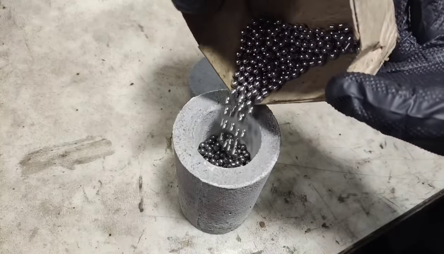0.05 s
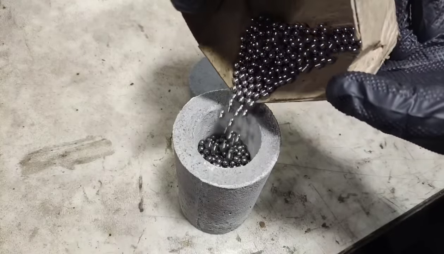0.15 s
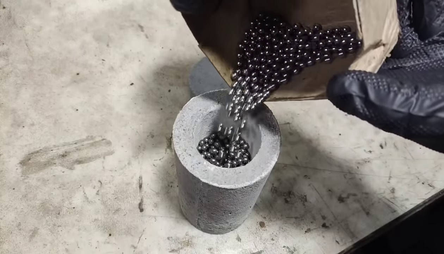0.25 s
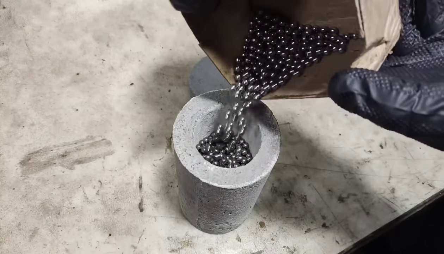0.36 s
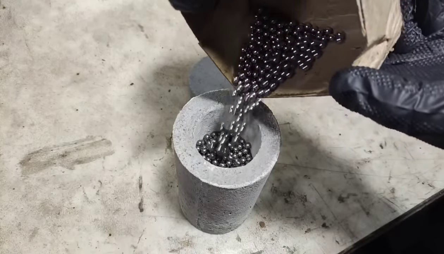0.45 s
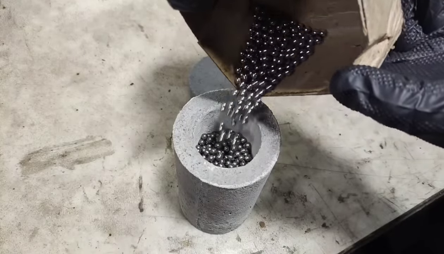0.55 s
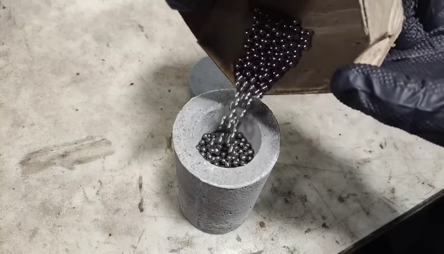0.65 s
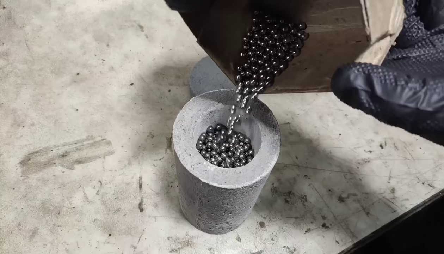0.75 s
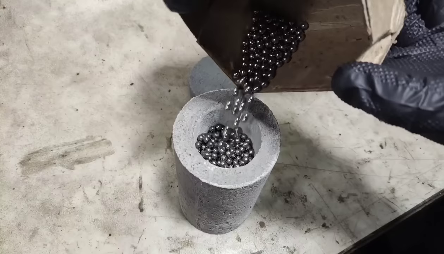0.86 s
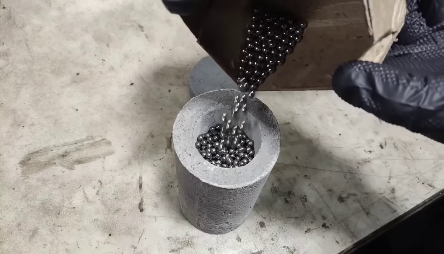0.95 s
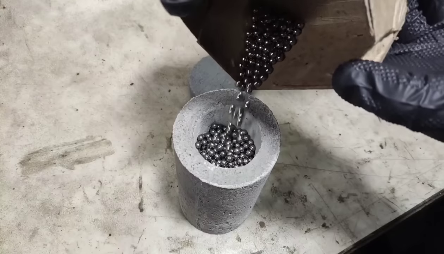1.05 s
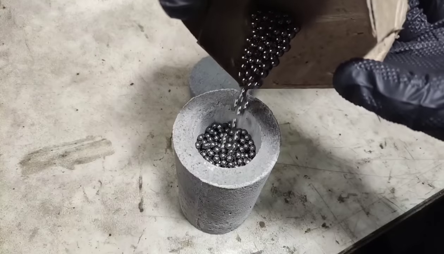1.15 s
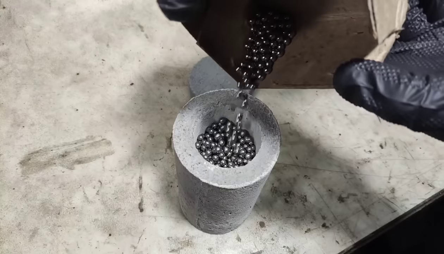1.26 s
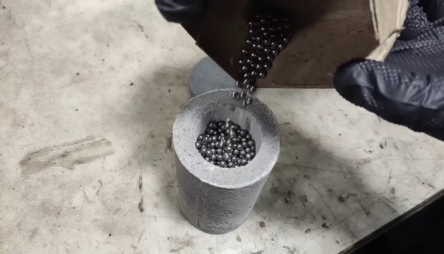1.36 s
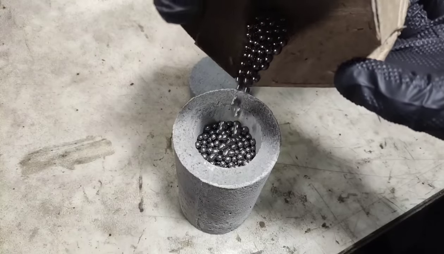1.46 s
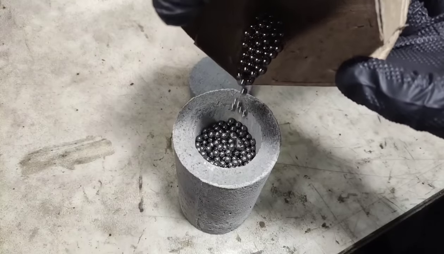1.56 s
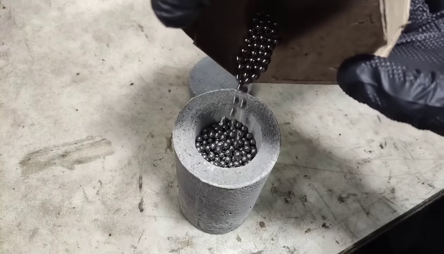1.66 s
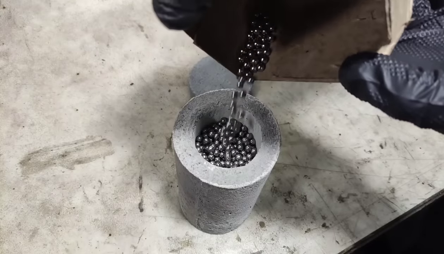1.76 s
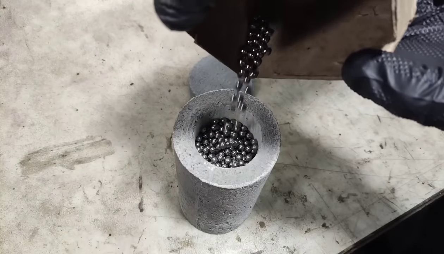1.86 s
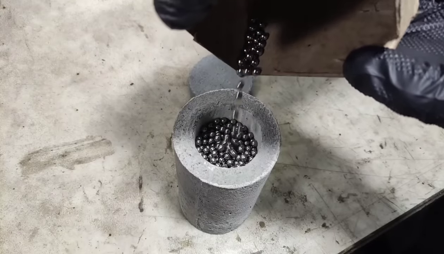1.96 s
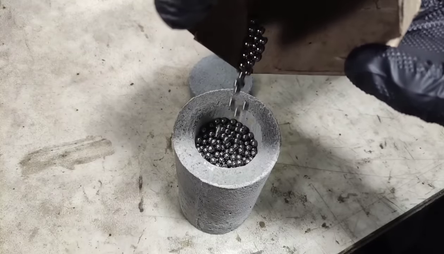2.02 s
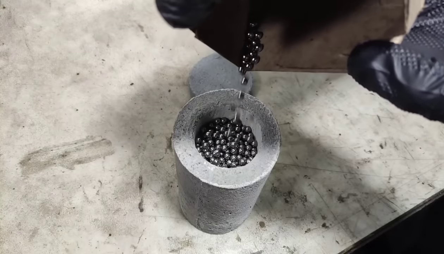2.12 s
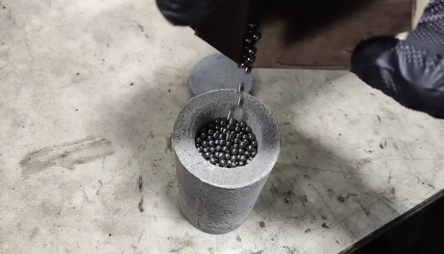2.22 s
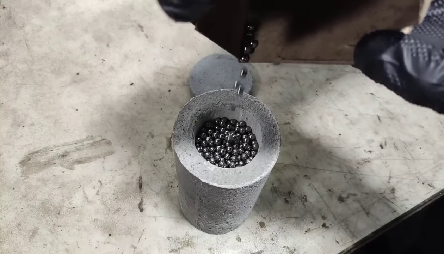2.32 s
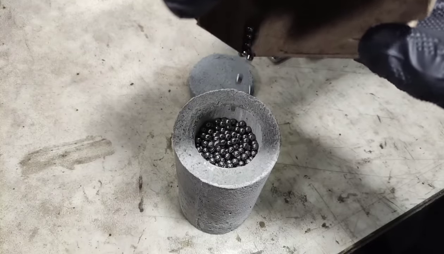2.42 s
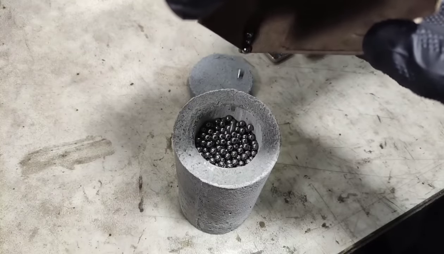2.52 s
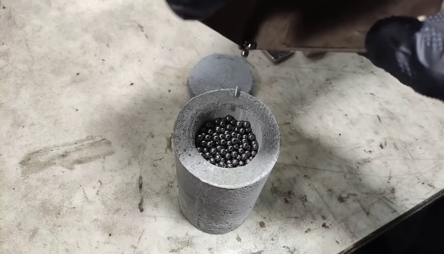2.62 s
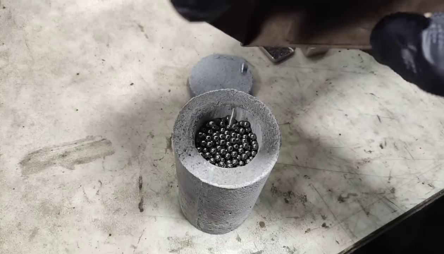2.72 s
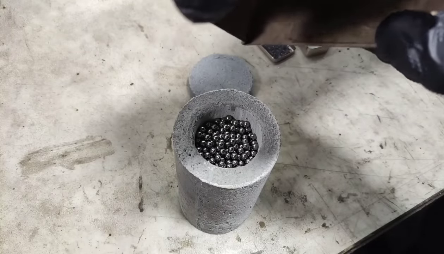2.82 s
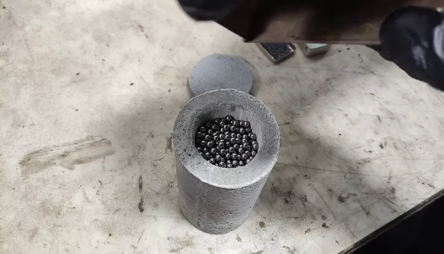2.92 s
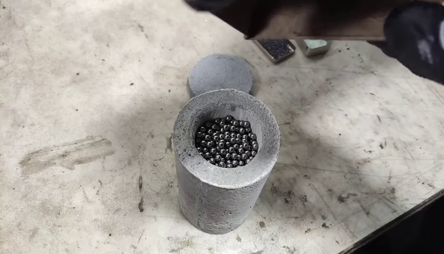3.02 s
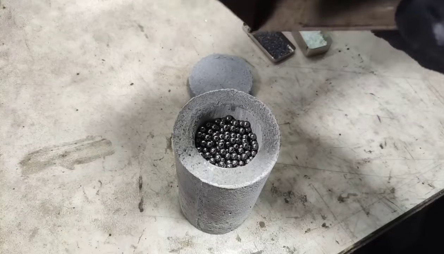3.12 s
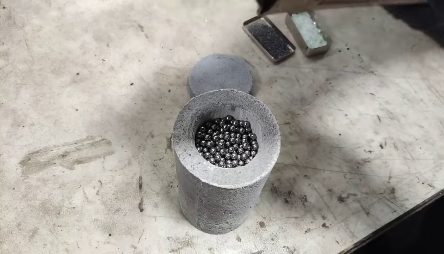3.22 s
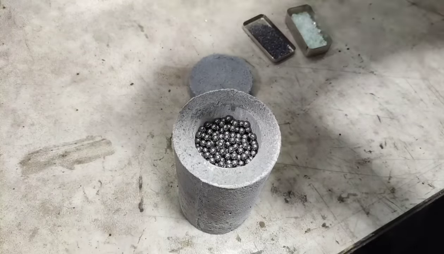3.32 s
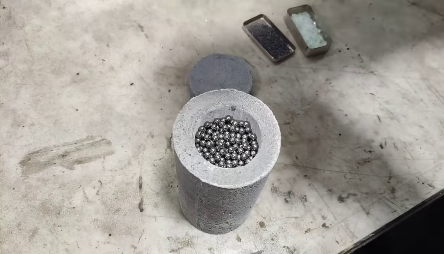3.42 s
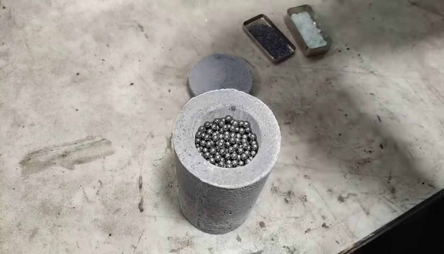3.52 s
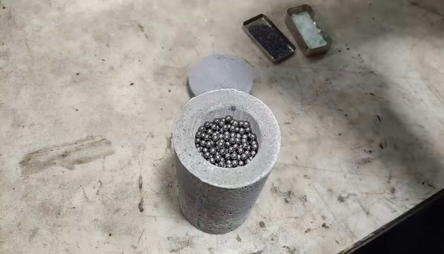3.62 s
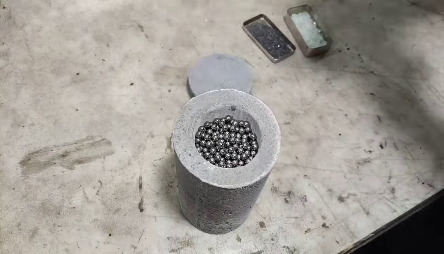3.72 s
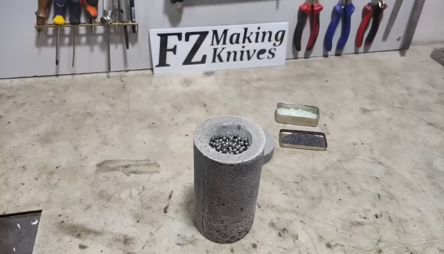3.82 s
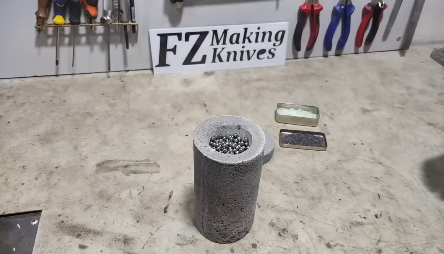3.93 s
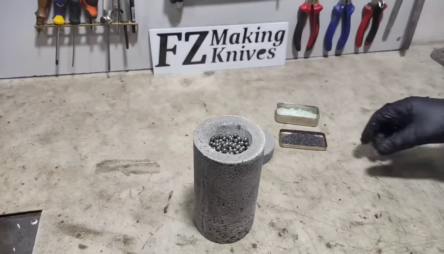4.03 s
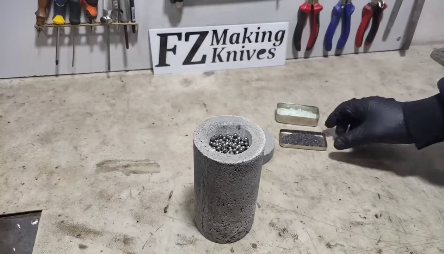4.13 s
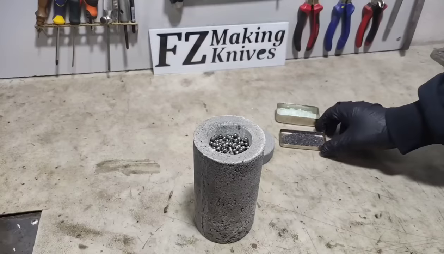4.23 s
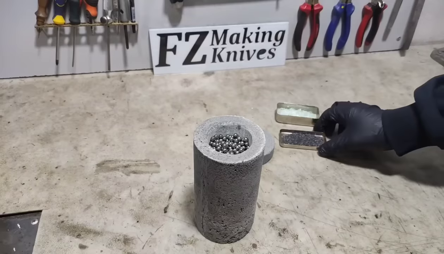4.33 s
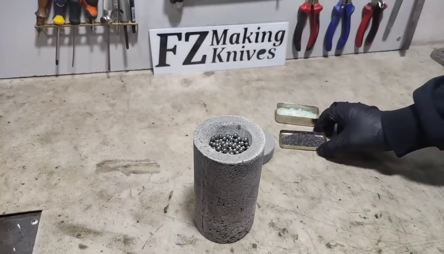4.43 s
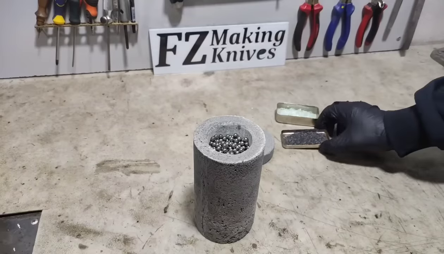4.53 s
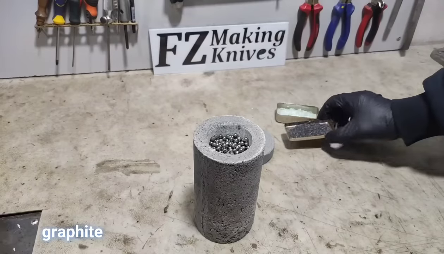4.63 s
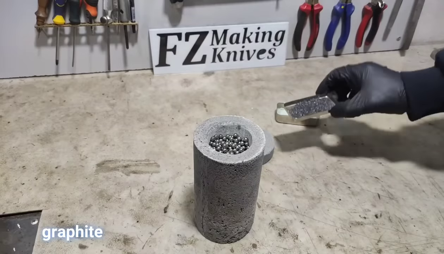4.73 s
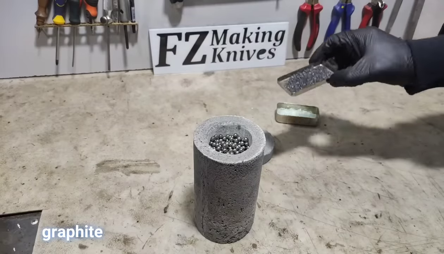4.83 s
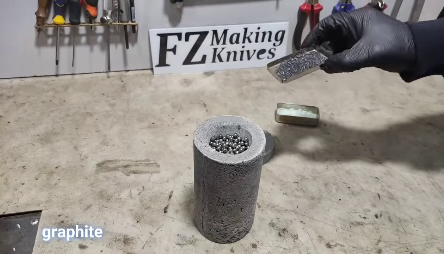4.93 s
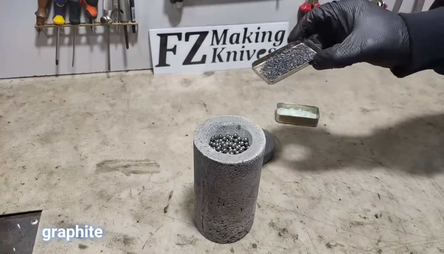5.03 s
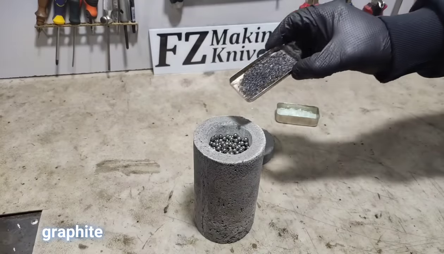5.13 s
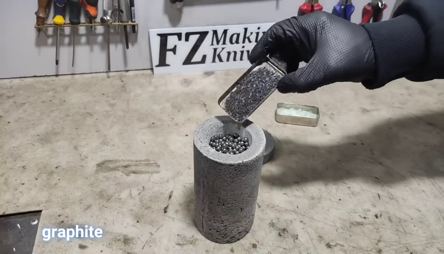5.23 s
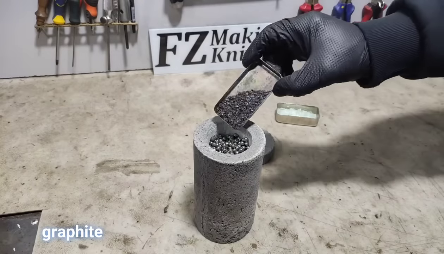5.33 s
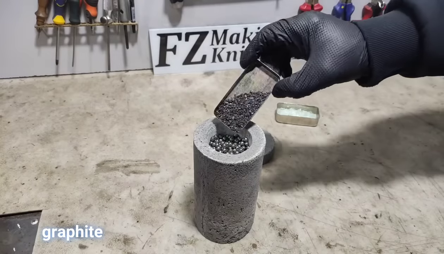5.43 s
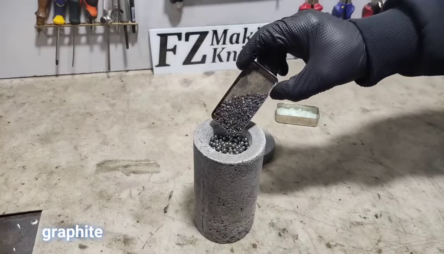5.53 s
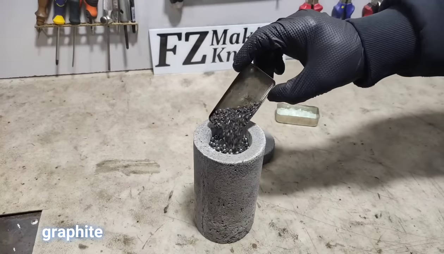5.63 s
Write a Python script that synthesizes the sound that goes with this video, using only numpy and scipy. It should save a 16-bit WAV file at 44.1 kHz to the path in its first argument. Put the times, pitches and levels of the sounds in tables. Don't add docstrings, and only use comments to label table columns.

```python
import sys
import numpy as np
from scipy import signal
from scipy.fft import rfft, irfft, next_fast_len
from scipy.io import wavfile
from scipy.ndimage import uniform_filter1d, map_coordinates

SR = 44100
rng = np.random.default_rng(int(sys.argv[2]) if len(sys.argv) > 2 else 0)


def volts_from_decibels(level):
    exponent = np.asarray(level, float) / 20
    return 10 ** exponent


def unload_wav(signal):
    wavfile.write(
        sys.argv[1],
        SR,
        np.round(np.clip(np.atleast_2d(signal).T, -1, 1) * 32767).astype(np.int16),
    )


N = 250047
SECONDS = np.arange(N) / SR

FULL_DB = -38
EMPTY_S, EMPTY_DB_PER_S = 3.01, 250
# start in seconds, peak in dB, left-right in dB, treble in dB.
LAST_BALLS = [(2.112, -23.5, 7, -14), (2.2783, -24.5, 10, -19), (2.3011, -23.5, 2, -17),
              (2.3334, -26.5, 5, -11), (2.354, -25, 0, -14.5), (2.382, -29.5, 0, -10), (2.414, -30, 1, -8),
              (2.434, -24, 8, -16), (2.454, -26.5, -2, -12), (2.482, -28, 0, -11.5),
              (2.493, -27.5, -1, -12), (2.533, -29, -1, -10), (2.586, -22.5, 9, -16),
              (2.611, -28.5, 4, -7.5), (2.6478, -41, 3, -12), (2.6843, -21, 0, -25),
              (2.7382, -26.5, 3, -12.5), (2.794, -29.5, -3, -21), (2.8728, -27, -2, -18),
              (2.9375, -25.5, -4, -13), (2.956, -28, 6, -4), (3.0029, -28, 3, -13)]


def unit(x):
    return x / np.sqrt(np.mean(x ** 2) + 1e-20)


def along(points, hz):
    f, v = np.transpose(points)
    return np.interp(np.log(hz + 1), np.log(f + 1), v)


def curve(rows):
    s, db = np.transpose(rows)
    return np.interp(SECONDS, s, db, left=-150, right=-150)


def wobble(rate):
    knots = rng.standard_normal(int(N * rate / SR) + 4)
    return map_coordinates(knots, [SECONDS * rate])


def fade(start_s, db_per_s):
    return -db_per_s * np.maximum(SECONDS - start_s, 0)


def filtered(x, response):
    m = next_fast_len(N + SR // 4)
    return irfft(rfft(x, m) * response(np.fft.rfftfreq(m, 1 / SR)), m)[..., :N]


def mode(f, hz, width_hz):
    return 1j * f * width_hz / (hz * hz - f * f + 1j * f * width_hz)


def noise(spectrum, alike):
    def response(hz):
        turn = np.arccos(np.clip(along(alike, hz), -1, 1)) / 2
        return volts_from_decibels(along(spectrum, hz)) * [np.cos(turn), np.sin(turn)]

    mid, side = filtered(rng.standard_normal((2, N)), response)
    return unit(np.array([mid + side, mid - side]))


def impulses(times, gains):
    at = np.clip(np.rint(times * SR).astype(int), 0, N)
    return np.bincount(at.ravel(), gains.ravel(), N + 1)[:N]


def stream(share):
    # time in seconds, rate in balls per second.
    ball_rate = [(0, 1100), (1, 900), (1.6, 650), (2.2, 400), (3.1, 150)]
    s, rate = np.transpose(ball_rate)
    t = np.arange(round(s[-1] * SR)) / SR
    passed = np.cumsum(share * np.interp(t, s, rate)) / SR
    times = np.interp(np.cumsum(rng.exponential(size=4000)), passed, t, right=N)
    return times[times < N]


def swing():
    # time in seconds, strength in dB.
    flow = [(0, -39), (.3, -38.5), (.45, -38.5), (.61, -38.5), (.65, -39), (.67, -37.5), (.9, -39.5),
            (1.0, -41), (1.08, -46.5), (1.13, -42.5), (1.4, -43.5), (1.6, -48.5), (1.85, -51.5),
            (2.03, -44.5), (2.2, -52.5), (2.27, -57), (2.6, -66), (3.08, -89)]
    return curve(flow) - FULL_DB


def lulls():
    # middle in seconds, depth in dB, half length in seconds.
    dips = [(0.274, 6, 0.0072), (0.352, 4, 0.011), (0.409, 8.5, 0.015), (0.482, 9, 0.0079),
            (0.627, 9.5, .006), (0.648, 8, 0.01), (0.77, 8, 0.0077), (0.91, 0, .005), (0.993, 5, .006),
            (1.058, -2, .005), (1.08, -1, .01), (1.208, 9, .008), (1.253, 14, 0.011), (1.313, 17, 0.0059),
            (1.338, 11, .006), (1.397, 10, .005), (1.49, 12, .004), (1.453, 11, .008), (1.554, 18, .006),
            (1.598, 10, 0.01), (1.716, 6, 0.0068), (1.797, 17, 0.011), (2.258, 19, .012),
            (1.912, 5, 0.0073), (2.074, 16, .007), (2.098, 13, .008), (2.19, 2, .007), (2.212, 7, 0.0065),
            (2.23, 8, .005)]
    return -sum(db * np.exp(-((SECONDS - s) / half) ** 2) for s, db, half in dips)


def clatter(times, db, pan_db, treble_db, spread, rise, first, count):
    # pitch in Hz, width in Hz, level in dB, dB gained a second as the heap rises.
    wall = [(2832, 157, 2.5, -0.1), (2990, 310, -12.5, 4.5), (3700, 400, -12, 0.5), (4170, 470, -4.5, -5.5),
            (5240, 750, -11.5, 2.5), (6350, 200, -0.5, -6), (6684, 130, 7.5, 2), (7150, 140, 5, -3),
            (7390, 210, 0, -1), (7560, 100, 5.5, 2.3), (7670, 26, -8, 1.5), (6700, 28, -7, 4),
            (7840, 124, 2.5, 1.9), (8150, 116, 3.5, -1)]
    # frequency in Hz, level in dB per Hz.
    tick = [(300, -9), (1200, -22), (2500, -4.5), (5000, -1.5), (8000, -4.5), (10000, -13), (20000, -30)]
    # frequency in Hz, level in dB per Hz.
    spark = [(4000, -18), (7500, -34), (9500, -3.5), (12000, -2.5), (15000, -0.5), (20000, -19)]
    draw = rng.standard_normal((len(times), 3, count))
    late = spread * np.abs(draw[:, 0]) ** 1.3
    size = np.tanh(draw[:, 1]) * volts_from_decibels(-5.5 * late / spread) * (1 - np.exp(-late / rise))
    late[:, 0] = rise
    size *= volts_from_decibels(db[:, None]) / np.linalg.norm(size, axis=1, keepdims=True)
    lag = .00005 + .00002 * draw[:, 2]
    at = times[:, None] + late

    def ears(gains):
        return np.array([impulses(at - side * lag, gains * volts_from_decibels(side * pan_db / 2)[:, None])
                         for side in (1, -1)])

    out = filtered(ears(size), lambda f: volts_from_decibels(along(tick, f)))
    out += filtered(ears(size * volts_from_decibels(treble_db[:, None])), lambda f: volts_from_decibels(along(spark, f)))
    size[:, 0] = first * np.abs(size).max(1)
    strike_db = 1.73 * rng.standard_normal((len(times), len(wall)))
    facing = np.sign(rng.standard_normal((len(times), len(wall))))
    for k, (hz, width_hz, level_db, gains_db) in enumerate(wall):
        blow_db = level_db + gains_db * times + strike_db[:, k]
        blows = size * (facing[:, k] * volts_from_decibels(blow_db))[:, None]
        out += filtered(ears(blows), lambda f: mode(f, hz, width_hz))
    return out


def pouring():
    times = stream(0.94)
    sizes_db, pan_db, treble_db = rng.standard_normal((len(times), 3)).T
    dense = clatter(times, 1.67 * sizes_db, 2.0 * pan_db, 3 * treble_db - 7.5,
                    spread=.003, rise=.0007, first=0.58, count=12)
    dense /= np.sqrt(np.abs(uniform_filter1d(np.mean(dense ** 2, 0), SR // 12))) + 0.00089
    thins = fade(2.25, 32)
    return volts_from_decibels(FULL_DB + swing() + thins + lulls() + 0.16 + 0.46 * wobble(44.8)) * dense


def landings():
    # start in seconds, peak in dB, left-right in dB.
    apart = [(0.0213, -19.5, -9), (0.114, -45, 2), (0.1447, -29, 1.0), (0.1942, -24.5, 6),
             (0.2197, -24.5, -5), (0.2278, -24.5, 2.0), (0.2874, -21, 3.0), (0.304, -26, 2.5),
             (0.362, -26.5, 0.5), (0.3691, -22, -2), (0.3918, -31, 0), (0.4247, -26.5, 10),
             (0.4597, -35, 7), (0.472, -30, 2), (0.494, -27, 3.0), (0.527, -25, 7), (0.554, -30, 1.5),
             (0.568, -36, -1), (0.577, -36, -1), (0.587, -39, 1.0), (0.6085, -21, -2), (0.6352, -30, 4),
             (0.6626, -27, 10), (0.6674, -28, -1), (0.7064, -36, 1.5), (0.7746, -25, 1), (0.7888, -26, 0),
             (0.819, -23, 0), (0.833, -27, -2), (0.8589, -22.5, -9), (0.8768, -30, 4), (0.8885, -28, 0),
             (0.9483, -31, 0), (0.9797, -25, 2.5), (0.9994, -33, 9), (1.011, -31, 10), (1.0425, -26, -1),
             (1.059, -34, 2.0), (1.0856, -37, 1.0), (1.1038, -31, 1.5), (1.1198, -28, 1.5),
             (1.158, -29, 1.5), (1.1667, -27, 1.5)]
    # start in seconds, peak in dB, left-right in dB.
    thinning = [(1.1938, -25, 2.0), (1.223, -26.5, 8), (1.2644, -24.5, 0), (1.3186, -29, 6),
                (1.349, -26, -3), (1.3836, -27.5, 2.5), (1.405, -26.5, 2), (1.4393, -33, -1),
                (1.4637, -36, 0.0), (1.471, -29, 1.5), (1.4779, -27.5, 1.0), (1.4985, -31, 3.5),
                (1.5232, -30, 8.0), (1.5223, -34, 1.5), (1.544, -32, 0), (1.5669, -29.5, -5),
                (1.582, -38, -4), (1.6175, -30.5, 0.5), (1.6257, -26, 5), (1.6484, -33, -2),
                (1.667, -27, -7), (1.6824, -33, -4), (1.6952, -28.5, -8), (1.718, -27.5, 3),
                (1.74, -32, 1.0), (1.7602, -29, -5), (1.8027, -29, 9), (1.811, -29, 7), (1.8353, -38, 3),
                (1.8516, -29, 8), (1.8703, -27, -3), (1.8905, -29.5, 6), (1.921, -29.5, 11),
                (1.942, -33, -6), (1.9605, -32, -5), (1.9774, -30, 0), (1.989, -28, 11), (2.014, -33, 3.0),
                (2.0323, -36, 3.0), (2.049, -27.5, 1.0), (2.082, -32, 0.5), (2.1223, -27, 2),
                (2.154, -29.5, 9), (2.1771, -28.5, 4), (2.1993, -31, -3), (2.2355, -33.5, -3)]
    # start in seconds, peak in dB.
    rebounds = [(2.1304, -27), (2.22, -31), (2.2937, -26.5), (2.445, -29), (2.6908, -25.5), (2.7458, -35),
                (2.799, -36), (2.816, -41), (2.8918, -44), (2.9268, -47), (2.964, -40), (3.021, -50),
                (2.609, -27), (2.629, -48), (3.033, -45), (1.784, -35), (2.006, -26), (2.059, -33),
                (2.2713, -27), (2.319, -30), (2.518, -42), (2.552, -45), (2.713, -41)]
    chance = stream(0.022)
    chance = chance[chance < 0.9]
    luck = rng.standard_normal((len(chance), 2))
    plain = [(s, db + 4.5, pan) for s, db, pan in apart]
    plain += [(s, db + 5, pan) for s, db, pan in thinning]
    plain += [(s, db, 1) for s, db in rebounds]
    plain += [(s, -36.5 - 4 * size, 5 * side) for s, (size, side) in zip(chance, luck)]
    edges_db = -17 + 3 * rng.standard_normal(len(plain))
    rows = LAST_BALLS + [(*row, edge) for row, edge in zip(plain, edges_db)]
    s, db, pan_db, treble_db = np.transpose(rows)
    return clatter(s, db + 11.5, 0.41 * pan_db, treble_db + 7.0,
                   spread=.0027, rise=.0012, first=1.25, count=60)


def ticks():
    # start in seconds, peak in dB.
    bright = [(1.2244, -33), (1.264, -36), (1.285, -31), (1.32, -37), (1.3488, -35), (1.4052, -36),
              (1.4631, -41), (1.471, -46), (1.498, -38), (1.5234, -41), (1.5627, -33), (1.5704, -38),
              (1.616, -41), (1.624, -39), (1.6826, -33), (1.718, -40), (1.7409, -41), (1.7594, -42),
              (1.803, -39), (1.8357, -40), (1.8532, -40), (1.8756, -38), (1.9215, -41), (1.941, -40),
              (1.9609, -33), (2.0058, -37), (2.048, -35), (2.0821, -41), (2.1091, -36), (2.131, -38),
              (2.1754, -40), (2.199, -34), (2.2193, -41), (2.2346, -39), (2.2768, -32), (2.304, -39),
              (2.271, -42), (2.295, -42), (2.321, -41), (2.365, -46), (2.443, -45), (2.518, -46),
                (2.553, -49), (2.649, -50), (2.713, -50), (2.816, -49), (2.855, -51), (2.893, -50),
                (2.928, -49), (2.965, -44), (3.022, -50)]
    s, db = np.transpose(bright)
    return clatter(s, db + 4.5, 2.5 * rng.standard_normal(len(s)), 13.5 + 0 * s,
                   spread=.0035, rise=.0008, first=0.93, count=50)


def rolling(roll_db):
    # pitch in Hz, width in Hz, level in dB.
    panels = [(396, 50, -12), (531.6, 22, -2), (608, 55, 0), (725, 147, -3), (886, 75, 0), (1065, 66, -5),
              (1375, 200, -12), (1907, 88, -6), (3780, 295, -10.5)]
    times = stream(.8)
    sizes = volts_from_decibels(1.2 * rng.standard_normal(len(times))) * rng.standard_normal(len(times))

    def box(f):
        return sum((-1) ** k * volts_from_decibels(db) * mode(f, hz, w) for k, (hz, w, db) in enumerate(panels))

    drum = filtered(impulses(times, sizes), box)
    drum /= np.sqrt(np.abs(uniform_filter1d(drum ** 2, SR // 5))) + 1e-4
    return volts_from_decibels(roll_db + fade(EMPTY_S, EMPTY_DB_PER_S) + 1.95 * wobble(12.06)) * drum


def knocking(roll_db):
    # start in seconds, peak in dB, pitch in Hz, sharpness in dB.
    hard_knocks = [(0.022, -21, 713, -6), (0.057, -27.5, 900, -21), (0.19, -30, 940, -14),
                   (0.254, -22.5, 704, -23), (0.275, -16.5, 780, -13.5), (0.295, -23, 927.8, -13),
                   (0.313, -19.5, 644, -29), (0.346, -27, 625, -27), (0.404, -27.5, 950, -6),
                   (0.665, -31.5, 980, -1), (0.704, -30.5, 840, -2), (0.935, -28, 870, -13),
                   (1.044, -30.5, 647, -25), (0.428, -30.5, 935, -10), (1.157, -25.5, 830, -14),
                   (1.222, -26, 840, -10), (1.247, -27.5, 850, -10), (1.359, -31, 670, 2),
                   (1.398, -27.5, 845, -2), (1.429, -36, 711.6, -1), (1.445, -23.5, 754, -19),
                   (1.584, -38.5, 695, 0), (1.62, -30, 860, -9), (1.717, -30.5, 754, -5),
                   (1.812, -34, 660, -4), (1.844, -32, 835, -15), (2.039, -29, 719, -18),
                   (2.06, -35, 550, -5), (2.023, -35, 800, -17), (2.078, -39, 750, -12),
                   (2.175, -37, 600, -9), (2.408, -44, 696, -12), (2.418, -43, 650, -8),
                   (2.383, -37.5, 615, -10), (2.790, -41, 730, -1.5), (2.790, -40.5, 500, -3.5)]
    # start in seconds, peak in dB, pitch in Hz.
    light_knocks = [(0.123, -38, 764), (0.142, -40, 810), (0.167, -37, 802), (0.214, -35, 804),
                    (0.28, -24, 720), (0.329, -30, 626), (0.395, -27.5, 1090), (0.455, -29, 780),
                    (0.51, -30.5, 870), (0.631, -30, 990), (0.684, -30, 660), (0.774, -32, 780),
                    (0.809, -34, 880), (0.849, -33, 633), (0.885, -43, 640), (0.916, -41, 880),
                    (1.025, -39, 640), (1.082, -39, 596), (1.106, -39, 910), (1.119, -30, 821),
                    (1.14, -37, 850), (1.205, -38, 874), (1.281, -48, 780), (1.304, -42, 818),
                    (1.326, -38, 880), (1.468, -34, 870), (1.494, -37, 568), (1.511, -36, 859),
                    (1.653, -35, 860), (1.778, -35, 814), (1.864, -37, 515), (1.89, -36, 720),
                    (1.935, -36, 557), (2.014, -32.5, 730), (2.126, -36.5, 850), (2.155, -36, 754)]
    nudge_times = stream(.012)
    luck = rng.standard_normal((len(nudge_times), 3))
    knocks = hard_knocks + [(s, db - 1.5, hz, -8) for s, db, hz in light_knocks]
    knocks += [(s, roll_db[round(s * SR)] + 3 * size, 760 * 1.12 ** pitch, -12 + 4 * hard)
               for s, (size, pitch, hard) in zip(nudge_times, luck)]
    knocks += [(s, db - 19, 600 * 1.2 ** rng.standard_normal(), -12) for s, db, *_ in LAST_BALLS]
    out, t = np.zeros(N + SR), np.arange(SR // 30) / SR
    for s, db, hz, sharp_db in knocks:
        phase = 2 * np.pi * hz * t
        flap = np.sin(phase) * volts_from_decibels(-60 * t / 0.014) * (1 - np.exp(-t / 0.00098))
        fold = np.sin(0.74 * phase) + np.sin(1.38 * phase)
        fold *= volts_from_decibels(-9 - 60 * t / 0.015) * (1 - np.exp(-t / 0.0022))
        edge = np.sin(2.19 * phase) * volts_from_decibels(sharp_db - 60 * t / 0.0056)
        out[round(s * SR):][:len(t)] += volts_from_decibels(db + 4.0) * (flap + fold + edge)
    low_hz = 380
    return filtered(out[:N], lambda f: -f * f / (low_hz ** 2 - f * f + 1.2j * f * low_hz))


def cardboard():
    roll_db = -41 + 0.56 * swing() - 3.5 * SECONDS
    return rolling(roll_db) + knocking(roll_db)


def bench():
    # frequency in Hz, level in dB per Hz.
    bench_tone = [(22, -6.5), (40, -7), (70, -11.5), (115, 0.5), (200, -10.5), (350, -4.5), (700, -25.5)]
    level_db = -54 + 0.32 * np.maximum(swing(), -26) + fade(EMPTY_S + 0.042, EMPTY_DB_PER_S)
    return volts_from_decibels(level_db + 1.2 * wobble(15.0)) * noise(bench_tone, [(100, 1.0), (300, 0.81)])


def air():
    # frequency in Hz, level in dB per Hz.
    quiet = [(12, -3.5), (20, 2), (32, -12.5), (48, -9), (68, -12), (198, -21.5), (270, -22), (301, -28),
             (422, -26), (873, -32.5), (1260, -33), (7520, -37), (14700, -39.5), (16000, -36)]
    # frequency in Hz, left-right likeness from -1 to 1.
    quiet_alike = [(60, 0.48), (130, 0.17), (290, 0.2), (640, -0.09), (1410, -0.14), (3100, 0.034),
                   (6820, -0.12), (15000, -0.029)]
    return volts_from_decibels(-60.5) * noise(quiet, quiet_alike)


def machinery():
    # pitch in Hz, width in Hz, level in dB.
    hums = [(103, 8, -84), (200, 8, -85), (292, 12, -85)]

    def response(f):
        return sum(volts_from_decibels(db) * np.sqrt(SR / np.pi / w) * mode(f, hz, w) for hz, w, db in hums)

    return filtered(rng.standard_normal(N), response)


def singing_tone(level_db, hz, width_hz):
    tone = filtered(rng.standard_normal(N), lambda f: mode(f, hz, width_hz))
    return volts_from_decibels(level_db) * unit(tone)


def empty_flap():
    # time in seconds, level in dB.
    flap_ring = [(3.05, -82.5), (3.55, -85), (3.85, -81.5), (3.95, -105)]
    return singing_tone(curve(flap_ring), 902, 12.24)


def gestures():
    # loudest moment in seconds, seconds for 10 dB of rise, seconds for 10 dB of fall,
    # hiss in dB, handling in dB.
    rustle = [
        (3.7, .4, 1.3, -75, -80),
        (3.58, .05, .07, -85, -73),
        (4.73, .08, .07, -77, -84),
        (5.44, .11, .09, -68.5, -84),
    ]
    shapes = []
    for s, rise, fall, hiss_db, cloth_db in rustle:
        away = np.maximum((s - SECONDS) / rise, (SECONDS - s) / fall)
        shapes.append(volts_from_decibels(-10 * away ** 2) * volts_from_decibels([[hiss_db], [cloth_db]]))
    return np.sqrt(np.sum(np.square(shapes), 0))


def glove_and_powder():
    # frequency in Hz, level in dB per Hz.
    grains = [(2500, -13), (4500, -9), (6000, -4.5), (7200, -0.5), (7700, 2.5), (8600, -11), (11000, -10.5)]
    # frequency in Hz, level in dB per Hz.
    fabric = [(250, -14), (800, 1.5), (1500, -11), (3000, -10.5), (6000, -48)]
    hiss, cloth = gestures()
    powder = hiss * volts_from_decibels(2.1 * wobble(150)) * noise(grains, [(5000, 0.17)])
    glove = cloth * volts_from_decibels(2.9 * wobble(40)) * noise(fabric, [(1000, 0.39)])
    return powder + glove


def tray():
    # frequency in Hz, level in dB per Hz.
    scrape = [(500, -14), (1100, 5), (2200, 1), (4000, -12), (8000, -21)]
    level_db = -75 - 10 * ((SECONDS - 4.73) / .045) ** 2
    return volts_from_decibels(level_db + 2.9 * wobble(90)) * noise(scrape, [(2000, 0.4)])


def far_drone():
    # time in seconds, level in dB.
    drone_level = [(4.9, -73.5), (5.25, -73.5), (5.5, -65.5), (5.67, -79)]
    return singing_tone(curve(drone_level), 85.2, 1.5)


def room(x):
    # frequency in Hz, seconds to fall by 60 dB.
    decay = [(200, 0.28), (1000, 0.15), (3000, 0.14), (5000, 0.073), (7500, 0.057), (10000, .03),
             (15000, 0.049)]
    hz, t, z = signal.stft(rng.standard_normal((2, SR // 2)), SR, nperseg=256)
    tail = signal.istft(z * volts_from_decibels(-60 * t / along(decay, hz)[:, None]), SR, nperseg=256)[1]
    late = np.pad(x, ((0, 0), (200, 0)))
    return signal.fftconvolve(late, tail / np.linalg.norm(tail[0]), axes=1)[:, :N]


def scene():
    # frequency in Hz, left-right in dB.
    tilt = [(60, 1), (110, -3), (200, 3.5), (380, 1), (700, 1.5), (1290, 2), (2380, -1), (4400, -6),
            (8120, 8), (15000, -8)]
    steel = pouring() + landings() + ticks()
    box = cardboard()
    box = np.array([box, np.roll(box, 3)])
    near = filtered(steel + box, lambda f: volts_from_decibels(np.outer([.5, -.5], along(tilt, f))))
    walls = room(volts_from_decibels(-7.0) * steel + volts_from_decibels(-11.5) * box)
    workshop = bench() + air() + machinery() + empty_flap() + glove_and_powder() + tray() + far_drone()
    return near + walls + workshop


def top_cut(x):
    return signal.sosfilt(signal.butter(12, 16820, fs=SR, output="sos"), x)


def record(dry):
    kept = filtered(dry, lambda f: 1 / (1 + (f / 15520) ** 300) + volts_from_decibels(-46))
    return top_cut(kept)


dry = scene()
out = record(dry)
unload_wav(out)
```